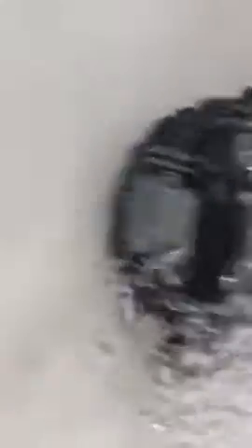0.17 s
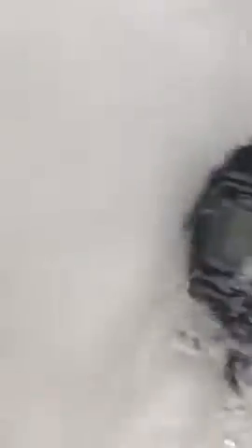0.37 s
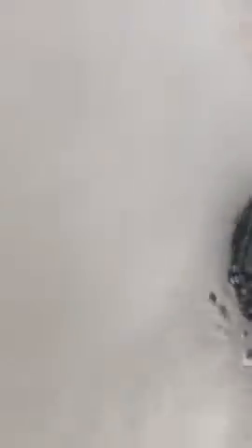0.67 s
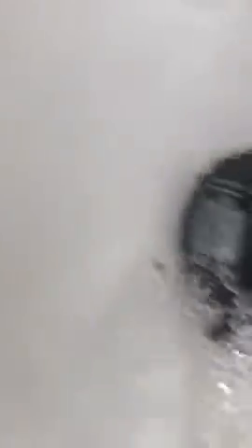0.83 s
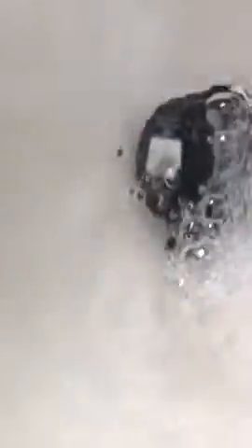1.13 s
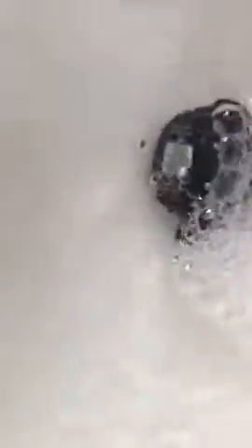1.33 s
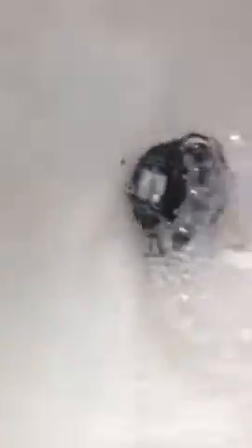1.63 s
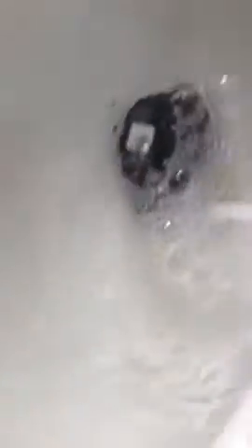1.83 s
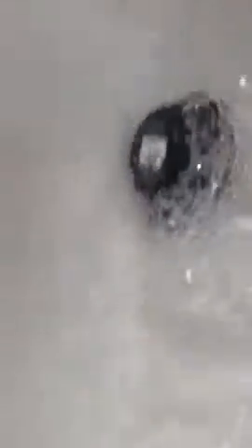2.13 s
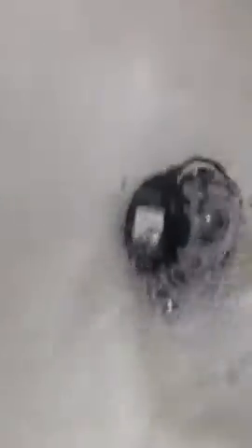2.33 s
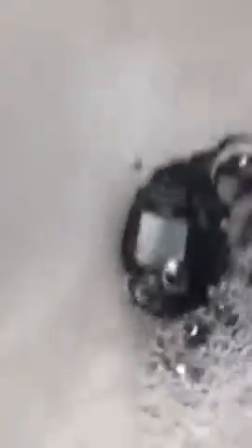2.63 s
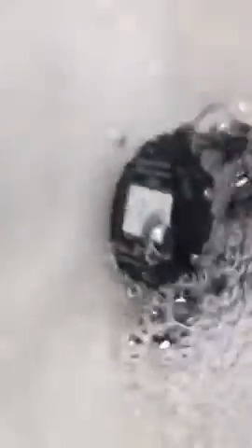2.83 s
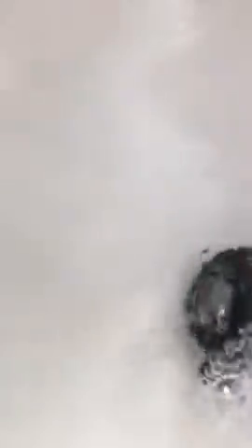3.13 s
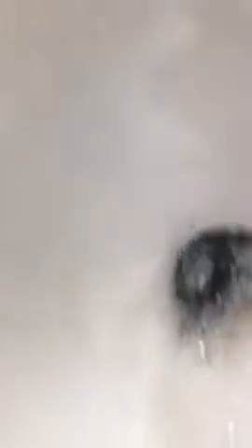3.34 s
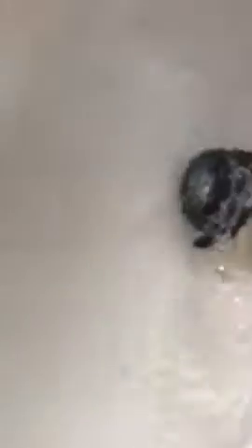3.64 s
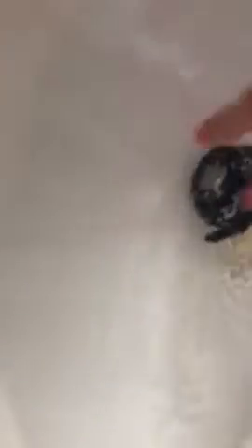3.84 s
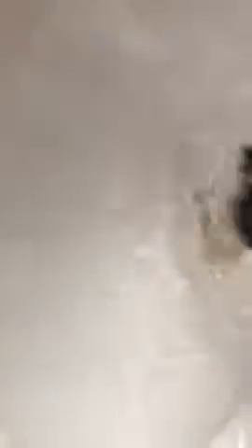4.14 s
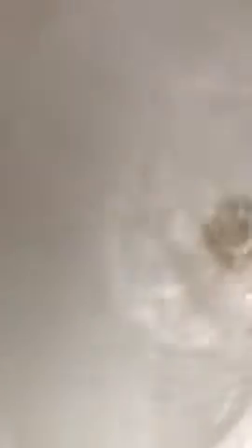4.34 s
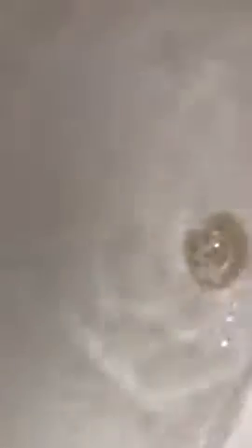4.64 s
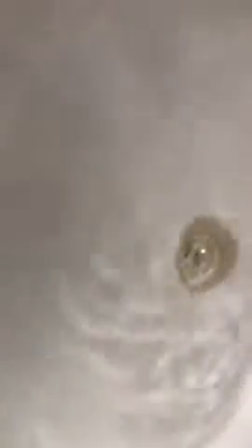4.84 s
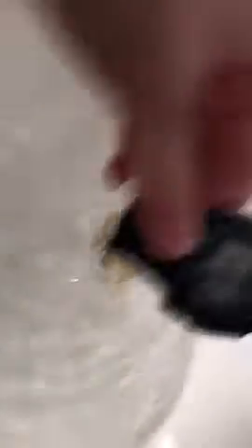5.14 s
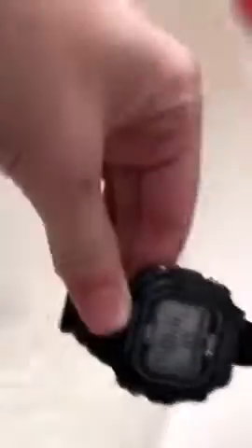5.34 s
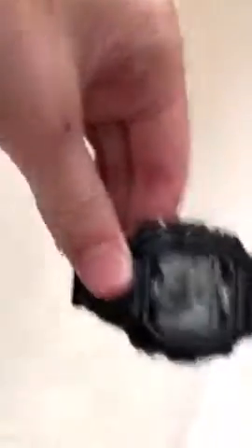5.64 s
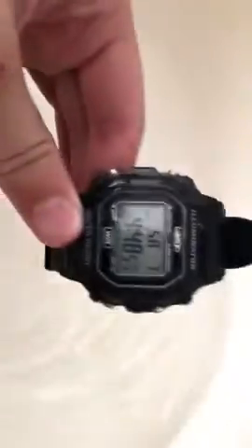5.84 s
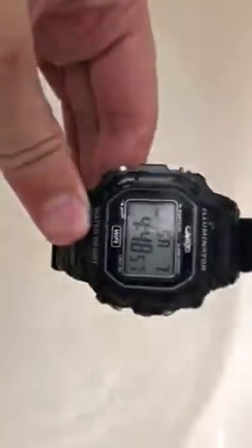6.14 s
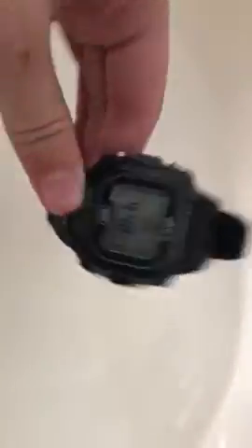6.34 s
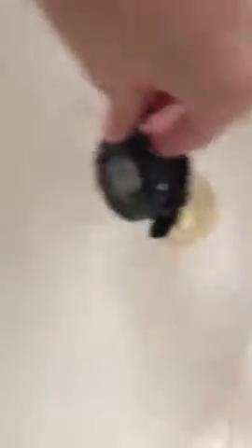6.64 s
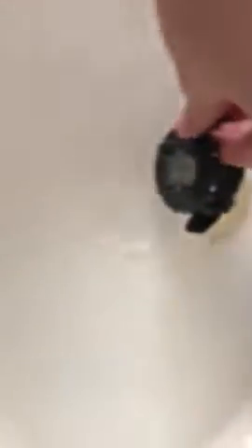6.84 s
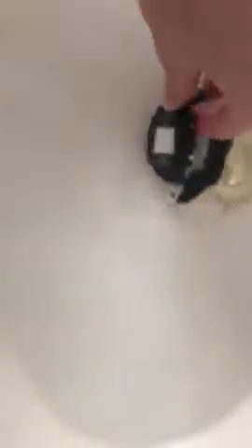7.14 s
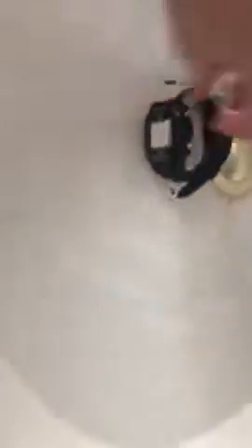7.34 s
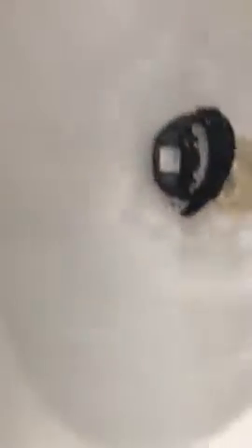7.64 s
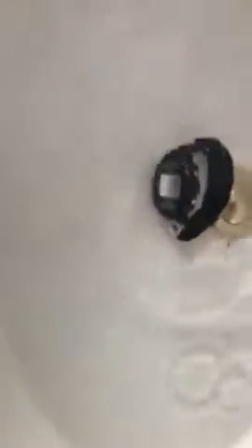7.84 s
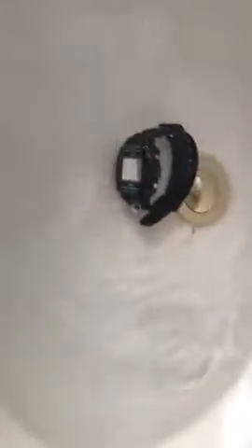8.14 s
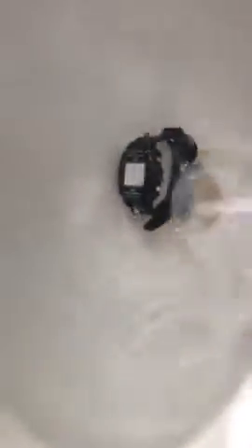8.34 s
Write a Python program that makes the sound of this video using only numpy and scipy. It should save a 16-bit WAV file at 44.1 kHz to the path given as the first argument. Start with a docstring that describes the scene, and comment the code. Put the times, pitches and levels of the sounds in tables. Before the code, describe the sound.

From 0 to 3.1 s a tap jet splashes close by over a plastic wristwatch in a washbasin: dense, bright hissing spray with uneven slaps and a lower splatter, its tone shifting as the water lands differently. It thins quickly, and around 3.25-3.3 s the tap shuts with a sharp click and dull pipe thud. Foam fizzes and crackles, fading steadily. From 3.7 to 5.3 s bubbles snap in the drain, with small gurgles and rising chirps, the most prominent at 4.6 s. Sparse faint pops continue over quiet ventilation rumble, low hum and a barely audible whine. At 7.2 s soft plastic knocks, at 7.5 s a crisp pop, at 7.9 s a light tap clunk. From 8.05 s the spout spits and whistles airily, then water surges strongly back with hard splashes until the end, about 8.5 s. Small bathroom, short echoes, identical channels.

```python
"""A tap runs over a plastic wristwatch in a washbasin: random droplets and tiny bubbles, coloured by where they land.
The tap is shut with a thud; noisy foam fizzes away and bubbles burst in the drain with gliding chirps.
The watch is put back with soft knocks, the spout whistles and spits, and the jet splashes over it again.
Low ventilation rumble, hum and a thin whine lie beneath; both channels carry the same signal."""
import sys
import numpy as np
from scipy import signal
from scipy.io import wavfile
from scipy.ndimage import uniform_filter1d

SR = 44100
rng = np.random.default_rng(int(sys.argv[2]) if len(sys.argv) > 2 else 0)


def pcm_store(signal):
    """Save signal as 16-bit PCM."""
    levels = np.round(np.clip(np.atleast_2d(signal), -1, 1) * 32767)
    wavfile.write(sys.argv[1], SR, levels.astype(np.int16).T)


N = 374409
TIME = np.arange(N) / SR
BINS = np.fft.rfftfreq(4096, 1 / SR)

# open jet, before valve and slugs: t/s, spray level/dB, low splatter level/dB
JET_LEVELS = [(0.04, -33, -46), (1.03, -34, -45), (1.08, -35.5, -47.5), (1.76, -33, -49),
              (1.85, -34.5, -50), (2.71, -34, -47.5), (3.06, -37, -48)]
# where the jet lands: t/s, stretch of the resonances/factor, share inside the strap's loop/0-1, colour depth/factor
LANDING_SPOTS = [(.17, 0.957, 0.3, 0.99), (.32, 1.024, 0.4, 1.4), (.76, 1.01, 0.3, 1.1),
                 (.88, 0.96, 0.1, 0.95), (.97, 0.753, 0.02, 0.85), (1.33, 0.75, 0.1, 0.74),
                 (1.45, 1.02, 0.87, .75), (2.14, 0.99, 1, 0.67), (2.28, 0.73, 0.15, 0.41),
                 (2.78, 0.76, .5, 0.34), (3.0, 0.77, 0, 0.58), (3.2, 0.57, 0, 1.2), (8.15, 0.87, 1, .5),
                 (8.49, 0.71, 0.4, 0.52)]
# splash resonances on the strap, at stretch and depth 1: f/Hz, width/Hz, lift/dB
STRAP_MODES = [(2530, 320, 7.5), (3550, 2800, 1), (4850, 570, 10.5), (6000, 680, 4.5), (7900, 340, -2),
               (8530, 1100, 7.5), (11300, 900, 6.5), (13240, 1500, 4)]
# splash resonances inside the strap's loop, at stretch and depth 1: f/Hz, width/Hz, lift/dB
LOOP_MODES = [(2940, 400, -4.5), (4495, 410, 12.5), (4930, 280, -13), (6130, 690, 6.5), (8100, 950, 4),
              (9200, 850, -0.5), (12760, 630, 8.5)]
# hollows and notches of the basin: f/Hz, width/Hz, lift/dB
BASIN_MODES = [(136.4, 10.4, 10), (328, 37, 5), (361.8, 30, 11), (534, 120, -4), (575, 15, 5),
               (709, 112, -4), (879, 84, 7), (985, 130, 3.5), (1383, 103, 4.5), (1554, 61, -7),
               (1849, 274, 4.5), (5685, 860, 2), (10460, 680, -5.5)]
# smooth spectrum of the spray: f/Hz, level/dB
SPRAY_SPECTRUM = [(30, -17.5), (100, -13), (250, -1.5), (500, -1.5), (1200, -4), (2500, 0.5), (5000, 1.5),
                  (9000, 4), (13000, 3), (15500, 1.5)]
# heaviest slugs of water slapping down: t/s, rise/dB
HEAVY_SLUGS = [(.187, 3.5), (.389, 3.5), (.475, 2.5), (.565, 3.5), (.658, 2), (1.167, 2.5), (1.423, 4.5),
               (1.688, 4), (2.12, 4.5), (2.299, 2), (2.436, 3), (2.58, 4.5), (2.903, 4), (8.176, 3)]
# smooth spectrum of the ventilation rumble: f/Hz, level/dB
AIR_SPECTRUM = [(15, -45), (25, -18), (66, -1.5), (133, -9.5), (173, -12.5), (227, -13), (322, -17),
                (349, -13.5), (523, -23.5), (722, -20.5), (782, -24), (1170, -27), (3530, -36.5),
                (6210, -42.5), (15500, -40)]
# steady hum and a thin whine: f/Hz, width/Hz, rms level/dB
HUM_BANDS = [(75.2, 5.3, -76), (223.5, 6.4, -77.5), (12100, 260, -89)]
# smooth spectrum of the foam hiss: f/Hz, level/dB
FOAM_SPECTRUM = [(300, -16), (500, -3), (1200, -7), (2500, -7), (4500, 1.5), (6500, -3.5), (8500, -9),
                 (10400, -27), (12000, -11), (15500, -8.5)]
# knocks of tap, hand and watch, and the blows of the last splash:
# t/s, peak level/dB, decay/s, brightness/dB per octave, share of the watch's own ring/0-1
KNOCK_EVENTS = [(3.2538, -27.5, 0.011, -1.5, 0), (3.285, -30, 0.024, -1, 0.3), (3.293, -19.5, 0.0038, 2, 0),
                (3.32, -32.5, .014, 0, 0.35), (4.023, -47.5, 0.0027, -5.5, 0.3),
                (7.205, -40.5, 0.0075, -3.5, 1), (7.221, -45.5, .012, -2, 1),
                (7.935, -40, 0.0059, -1, 0.66), (8.256, -31.5, .017, 0.5, 0.1), (8.318, -24, 0.0098, 4, 0),
                (8.404, -20.5, 0.028, 4.5, 0), (8.418, -22, .011, 2, 0), (8.433, -16.5, .01, 0, 0)]
# smooth spectrum of a knock: f/Hz, level/dB
KNOCK_SPECTRUM = [(25, -33), (50, -8), (100, -5), (400, 0.5), (700, 1), (1500, -5.5), (3000, -5.5),
                  (7000, -6.5), (15000, -19)]
# ring of basin and watch in every knock: f/Hz, width/Hz, lift/dB
BODY_MODES = [(134, 22, 1.5), (298, 41, -8.5), (390, 125, 8), (670, 100, 5), (1680, 700, 7.5)]
# ring of the watch case, at full share: f/Hz, width/Hz, lift/dB
CASE_MODES = [(660, 120, 2), (1000, 130, 16), (1380, 130, 7), (1750, 400, -6), (3030, 500, 2),
              (4290, 500, 3)]
# shudders of the plumbing as the flow stops and starts: t/s, level/dB
PIPE_SHUDDERS = [(3.2543, -42), (3.318, -40), (7.935, -49.5), (8.255, -45.5)]
# large bubbles with an opening skin, gliding mostly upwards:
# t/s, level/dB, start f/Hz, end f/Hz, length/s, lingering share/0-1, snap share/0-1
LARGE_BUBBLES = [(4.276, -43.5, 1396, 1750, .023, 0.22, 0.46), (4.342, -49, 2130, 2930, 0.019, .54, .3),
                 (4.361, -39, 2230, 2700, .02, .08, .3), (4.407, -38, 2100, 2870, .017, 0.089, .15),
                 (4.638, -24, 1160, 2630, 0.098, 0.043, 0.9), (4.881, -34, 1055, 2850, 0.09, 0.17, 0.66),
                 (4.998, -40.5, 2420, 3760, 0.025, 0.34, .1), (5.142, -45, 1290, 1810, 0.024, 0.043, 1),
                 (5.301, -46, 4330, 3650, 0.023, 0.21, 0.26), (8.419, -26, 2600, 4000, .012, .74, .2)]
# loudest bubbles snapping: t/s, peak level/dB, f/Hz
LOUD_POPS = [(3.672, -44, 11200), (3.69, -34, 11900), (3.702, -38.5, 4400), (3.714, -41, 4400),
             (3.881, -29, 12300), (4.081, -42, 11100), (4.352, -37, 6970), (4.4386, -42, 4430),
             (4.6685, -23, 7470), (4.7001, -27, 5930), (4.7315, -29, 8000), (4.736, -25, 4840),
             (4.7645, -26, 3240), (4.842, -42, 3500), (4.9527, -34.5, 3280), (5.093, -47, 5800),
             (5.1, -42, 14500), (5.194, -43, 3810), (5.9312, -46, 6000), (6.312, -47, 6600),
             (7.037, -52, 2820), (7.5132, -33, 6000)]
# air whistling out of the refilling spout: t/s, length/s, start f/Hz, end f/Hz, rms level/dB
SPOUT_WHISTLES = [(8.042, 0.057, 6170, 11300, -51.5), (8.086, .04, 5720, 4830, -52),
                  (8.131, 0.083, 4014, 3550, -48)]

# shutting: the jet thins to a dribble, which then stops; dribble levels are relative to the open jet
SHUT_S, CLOSING_S, DRY_S = 3.083, 0.067, 3.27
DRIBBLE_SPRAY_DB, DRIBBLE_LOW_DB = -20, -4
# opening: the flow swells steeply, then the full spray arrives with a fading kick of stored pressure
OPEN_S, FULL_S = 8.055, 8.172
SWELL_DB, SWELL_DB_PER_S, SWELL_LOW_DB_PER_S = -2, 157, 260
KICK_DB, KICK_S, REOPENED_LOW_DB = 6.5, 0.59, -5
# lighter slugs fall between the heavy ones at a loose beat; every slug thins out alike
SLUG_GAP_S, SLUG_JITTER_S, SLUG_DB, SLUG_SPREAD_DB, SLUG_THINS_S = .088, 0.014, 2.5, 0.73, 0.06
ROOM_TONE_DB = -63.5
# foam dies away steadily from the shutting on, over a constant faint film
FOAM_S, HISS_DB, HISS_DB_PER_S, FILM_DB = 3.08, -50, -16, -84.5
CRACKLE_DB, CRACKLE_DB_PER_S = -61.5, -5.5
# the last water gurgles into the plughole in a run of small glugs; level is that of the loudest
GURGLE_S, GURGLE_END_S, GURGLE_DB, GURGLE_HZ, GURGLE_OCTAVES = 4.1, 4.53, -50, 2250, .65
# fainter bubbles snap at random, ever more softly; level is the upper limit at the start
FAINT_S, FAINT_END_S, FAINT_DB, FAINT_DB_PER_S, FAINT_HZ, FAINT_OCTAVES = 3.75, 6.9, -39.5, -5.5, 6910, 0.56
EDGE_HZ = 15600  # top of the recorder's band


def amp(db):
    """Decibels to gain."""
    return 10 ** (np.asarray(db) / 20)


def unit(x):
    """Scales to rms 1."""
    return x / np.sqrt(np.mean(x ** 2) + 1e-20)


def add(mix, s, sound):
    """Mixes a sound in at time s, in place."""
    part = mix[round(s * SR):][:len(sound)]
    part += sound[:len(part)]


def slope(points):
    """A smooth spectrum in dB on BINS, drawn over log frequency."""
    hz, db = np.transpose(points)
    return np.interp(np.log(BINS + 1), np.log(hz), db)


def lifts(modes, hz=BINS):
    """Resonance bumps and notches in dB."""
    return sum(db / (1 + (1.37 * (hz - centre) / width) ** 2) ** 2 for centre, width, db in modes)


def colour(x, db):
    """Causal minimum-phase filter with the given gain, so that resonances ring after each impact."""
    log_gain = np.log(amp(np.concatenate([db, db[-2:0:-1]])))
    response = np.fft.ifft(np.exp(np.conj(signal.hilbert(log_gain)))).real
    return signal.oaconvolve(x, response)[:len(x)]


def band(x, lo_hz, hi_hz):
    """Band-pass."""
    return signal.sosfilt(signal.butter(2, [lo_hz, hi_hz], "band", fs=SR, output="sos"), x)


def impacts(per_s, spread_db):
    """Random impacts of either sign, a few much larger than the rest."""
    size = amp(spread_db * np.minimum(rng.exponential(1, N), 5)) * rng.choice([-1, 1], N)
    return unit(size * (rng.random(N) < per_s / SR))


def waver(seconds, size=N):
    """Smooth chance of rms 1."""
    width = max(int(seconds * SR), 2)
    once = uniform_filter1d(rng.standard_normal(size), width)
    return unit(uniform_filter1d(once, width))


def scatter(start, end, spread_db, octaves, count):
    """Loosely spaced chance events: rows of (t/s, level/dB below the top level, factor on the usual pitch)."""
    place, size, pitch = rng.random((count, 3)).T
    times = start + (end - start) * (np.arange(count) + place) / count
    return zip(times, -spread_db * size, 2 ** (octaves * (2 * pitch - 1)))


def snap(hz, cycles, crack):
    """A bursting film: a short crack above the pitch of the cavity, which rings on; peak 1."""
    t = np.arange(2048) / SR
    ring = np.sin(2 * np.pi * hz * t) * np.exp(-t * hz / cycles)
    burst = rng.standard_normal(len(t)) * np.exp(-t / 0.0011)
    sound = band(ring + crack * burst, 0.82 * hz, 13500)
    return sound / abs(sound).max()


def bubbles(lo_hz, hi_hz, per_s, spread_db, cycles, count=24):
    """A swarm of tiny bubbles: the smaller the cavity, the higher its ring."""
    drive, out = impacts(per_s, spread_db), np.zeros(N)
    kinds = [snap(hz, cycles, crack=0.19) for hz in np.geomspace(lo_hz, hi_hz, count)]
    at = np.flatnonzero(drive)
    for i, kind in zip(at, rng.integers(0, count, len(at))):
        add(out, i / SR, drive[i] * kinds[kind])
    return unit(out)


def jet():
    """Droplets and bubbles, coloured by the spot they land on and by the basin."""
    s, spray_db, low_db = np.transpose(JET_LEVELS)
    spray_open, low_open = valve()
    drops = impacts(per_s=16000, spread_db=2.0)
    drops += amp(-13.0) * bubbles(1499, 15240, per_s=2600, spread_db=1.1, cycles=10.3)
    in_basin = colour(drops, slope(SPRAY_SPECTRUM) + lifts(BASIN_MODES))
    splash = landing(in_basin, patchy_db=1.0, flicker_db=1.4, echo_ms=0.499, echo_db=-21.5)

    low = signal.sosfiltfilt(signal.butter(2, 1500, fs=SR, output="sos"), splash)
    top = signal.sosfiltfilt(signal.butter(2, 9000, "high", fs=SR, output="sos"), splash)
    middle = splash - low - top
    spray = middle * amp(.8 * waver(.008)) + top * amp(1.5 * waver(.01))
    spray /= np.sqrt(uniform_filter1d(spray ** 2, size=SR // 4))  # the spot sets the colour, not the level
    spray *= spray_open * amp(np.interp(TIME, s, spray_db))
    splatter = unit(low) * amp(np.interp(TIME, s, low_db) + 0.42 * waver(0.012))
    # the low splatter flows evenly; only the fine spray follows the slugs
    return spray * surge() + low_open * splatter


def landing(x, patchy_db, flicker_db, echo_ms, echo_db):
    """The colour of the spot: its pattern slides with the geometry, and the shifting water film blurs it."""
    hz, t, z = signal.stft(x, SR, nperseg=512, noverlap=384)
    s, *columns = np.transpose(LANDING_SPOTS)
    stretch, in_loop, depth = (np.interp(t, s, column) for column in columns)
    seen_hz = hz[:, None] / stretch
    on_strap = 1 - in_loop
    db = depth * (on_strap * lifts(STRAP_MODES, seen_hz) + in_loop * lifts(LOOP_MODES, seen_hz))
    slow, fast = rng.standard_normal((2, len(hz), len(t)))
    patches = uniform_filter1d(uniform_filter1d(slow, size=5, axis=0), size=45, axis=1)
    flicker = uniform_filter1d(uniform_filter1d(fast, size=7, axis=0), size=7, axis=1)
    db += patchy_db * unit(patches) + flicker_db * unit(flicker)
    # a reflection from the basin wall; its delay is echo_ms at stretch 1
    comb = 1 - amp(echo_db) * np.exp(-2j * np.pi * seen_hz * echo_ms / 1000)
    return unit(signal.istft(z * amp(db) * comb, SR, nperseg=512, noverlap=384)[1][:N])


def surge():
    """Each slug hits at once and thins out; light ones fill the time between the heavy ones."""
    slugs = list(HEAVY_SLUGS)
    edges = [0] + [s for s, _ in HEAVY_SLUGS] + [N / SR]
    chance = iter(rng.standard_normal((400, 2)))
    for start, end in zip(edges, edges[1:]):
        steps = max(round((end - start) / SLUG_GAP_S), 1)
        beats = np.linspace(start, end, steps + 1)[1:-1]
        for s, (late, size) in zip(beats, chance):
            slugs.append((s + SLUG_JITTER_S * late, SLUG_DB + SLUG_SPREAD_DB * size))
    db = np.zeros(N)
    thinning = np.exp(-(TIME[:SR // 4] / SLUG_THINS_S) ** 2)
    for s, rise_db in slugs:
        add(db, max(s, 0), rise_db * thinning)
    return amp(uniform_filter1d(db, size=220) - 1.5)  # 5 ms of smoothing softens each onset


def valve():
    """Gains of the spray and of the low splatter as the tap is shut and opened again."""
    closed = np.clip((TIME - SHUT_S) / CLOSING_S, 0, 1)
    running = np.clip((DRY_S - TIME) / 0.045, 0, 1)
    early, since = np.maximum(FULL_S - TIME, 0), np.maximum(TIME - FULL_S, 0)
    swell_db = SWELL_DB - SWELL_DB_PER_S * early
    spray_db = np.where(TIME < FULL_S, swell_db, KICK_DB * np.exp(-since / KICK_S))
    low_db = REOPENED_LOW_DB - SWELL_LOW_DB_PER_S * early
    gains = [running * amp(closed * dribble_db) + (TIME > OPEN_S) * amp(again_db)
             for dribble_db, again_db in [(DRIBBLE_SPRAY_DB, spray_db), (DRIBBLE_LOW_DB, low_db)]]
    return uniform_filter1d(np.array(gains), size=220)


def room_tone():
    """Low ventilation rumble as coloured noise, with a hum and a thin whine as narrow noise bands."""
    out = amp(ROOM_TONE_DB) * unit(colour(rng.standard_normal(N), slope(AIR_SPECTRUM)))
    for hz, width, db in HUM_BANDS:
        out += amp(db) * unit(band(rng.standard_normal(N), hz - width / 2, hz + width / 2))
    return out


def foam():
    """Bursting foam: hiss in clumps of tiny impacts, and a brighter crackle, both fading."""
    age = np.maximum(TIME - FOAM_S, 0)
    hiss = unit(colour(impacts(per_s=1600, spread_db=3.0), slope(FOAM_SPECTRUM)))
    hiss += amp(-6.0) * bubbles(3500, 7000, per_s=380, spread_db=9.5, cycles=5.1)
    clumps = unit(amp(2.5 * waver(0.0069)))
    crackle = bubbles(5460, 13570, per_s=200, spread_db=3.5, cycles=7.5)
    hiss_gain = amp(HISS_DB + HISS_DB_PER_S * age) + amp(FILM_DB)
    crackle_gain = amp(CRACKLE_DB + CRACKLE_DB_PER_S * age)
    return (TIME > FOAM_S) * (hiss * clumps * hiss_gain + crackle * crackle_gain)


def knocks():
    """Dull and bright blows through the basin, and the low shudder of the plumbing."""
    out, t = np.zeros(N), np.arange(SR // 2) / SR
    for s, db, decay, bright_db, watch_share in KNOCK_EVENTS:
        push = rng.standard_normal(len(t)) * np.exp(-t / decay)  # the noisy tail after the contact
        push[:3] += 2  # the contact itself
        body = slope(KNOCK_SPECTRUM) + lifts(BODY_MODES) + watch_share * lifts(CASE_MODES)
        tilt = bright_db * np.log2(BINS / 1000 + 0.081)
        blow = colour(push, body + tilt)
        add(out, s, amp(db) * blow / abs(blow).max())
    shudder = thud(t, hz=76.3, decay=0.046)
    shudder += 0.67 * thud(t, hz=136.3, decay=0.0316) + 0.45 * thud(t, hz=51.7, decay=.035)
    for s, db in PIPE_SHUDDERS:
        add(out, s, amp(db) * shudder)
    return out


def thud(t, hz, decay):
    """A low mode of the plumbing swells and dies."""
    return np.sin(2 * np.pi * hz * t) * (1 - np.exp(-t / 0.01)) * np.exp(-t / decay)


def drain():
    """Bubbles burst over the plughole; the widening hole lifts the pitch of most large ones."""
    out = np.zeros(N)
    gurgle = []
    for s, db, pitch in scatter(GURGLE_S, GURGLE_END_S, spread_db=8.5, octaves=GURGLE_OCTAVES, count=9):
        hz = GURGLE_HZ * pitch
        gurgle.append((s, GURGLE_DB + db, hz, 1.18 * hz, 0.0175, .2, .5))  # columns as in LARGE_BUBBLES
    for s, db, start_hz, end_hz, length, linger, snap_share in LARGE_BUBBLES + gurgle:
        bubble = glug(start_hz, end_hz, length, linger, snap_share)
        add(out, s, amp(db) * bubble)
        add(out, s, amp(db) * snap_share * snap(1.25 * start_hz, cycles=0.67, crack=0.52))

    faint = [(s, FAINT_DB + FAINT_DB_PER_S * (s - FAINT_S) + db, FAINT_HZ * pitch)
             for s, db, pitch in scatter(FAINT_S, FAINT_END_S, spread_db=10.5, octaves=FAINT_OCTAVES, count=18)]
    for s, db, hz in LOUD_POPS + faint:
        crack = 0.34 * (1 + (3600 / hz) ** 4)  # a larger film tears with a harder crack
        add(out, s, amp(db) * snap(hz, cycles=7.0, crack=crack))
    return signal.sosfilt(signal.butter(2, 600, "high", fs=SR, output="sos"), out)  # small cavities radiate no bass


def glug(start_hz, end_hz, length, linger, snap_share):
    """The ring of one large bubble, its pitch gliding as the skin opens."""
    size = int(length * SR)
    t = np.arange(size) / SR
    opening = (t / length) ** (1 + length / .027)  # a large skin holds longer before it gives way
    recoil = 1 + 0.41 * snap_share * np.exp(-t / 0.00092)  # a hard snap starts sharp and settles
    hz = start_hz * (end_hz / start_hz) ** opening * recoil
    hz *= 1 + .025 * waver(.001, size=size)
    flutter = amp(4 * waver(.0037, size=size))
    fade = (1 - linger) * np.exp(-t / 0.0032) + linger * np.exp(-t / 0.1) * flutter
    fade *= np.minimum((length - t) / 0.0014, 1)
    fade *= 1 - np.exp(-t * snap_share / .00006)  # soft bursts swell in
    return fade * np.sin(2 * np.pi * np.cumsum(hz) / SR)


def spout():
    """Trapped air squeals out ahead of the water, in a narrow gliding band of noise."""
    out = np.zeros(N)
    for s, length, start_hz, end_hz, db in SPOUT_WHISTLES:
        size = int(length * SR)
        carrier = np.exp(2j * np.pi * np.cumsum(np.linspace(start_hz, end_hz, size)) / SR)
        flutter = 1.1 + waver(0.00075, size=size) + 1j * waver(0.0013, size=size)
        whistle = (carrier * flutter).real * signal.windows.tukey(size, .3)
        add(out, s, amp(db) * unit(whistle))
    add(out, 8.046, amp(-40.5) * snap(hz=3860, cycles=2.6, crack=1.2))  # the first spit
    return out


def bathroom(x, rim_db, wall_db, tail_db, t60):
    """Echoes from the rim of the basin, a slap from the ceiling and a short tail, all as shaped noise."""
    t = np.arange(SR // 2) / SR
    rim, wall, tail = rng.standard_normal((3, len(t)))
    rim = rim * np.exp(-t / 0.0026) * (t > .0006)
    wall = wall * np.exp(-abs(t - .0095) / 0.0017)
    tail = tail * amp(-60 * t / t60) * (t > .005)
    parts = [(rim_db, rim), (wall_db, wall), (tail_db, tail)]
    echoes = sum(amp(db) * part / np.linalg.norm(part) for db, part in parts)
    return x + signal.oaconvolve(x, echoes)[:N]


def scene():
    """The small sounds get the echoes, jet and room tone stay direct; both channels are alike."""
    small = foam() + knocks() + drain() + spout()
    echoing = bathroom(small, rim_db=-9, wall_db=-15, tail_db=-13, t60=0.25)
    mono = jet() + room_tone() + echoing
    return np.array([mono, mono])


def record(dry):
    """The recorder's band limit: a steep low-pass."""
    lowpass = signal.firwin(511, EDGE_HZ, window=("kaiser", 9), fs=SR)
    return signal.oaconvolve(dry, lowpass[None], "same")


dry = scene()
out = record(dry)
pcm_store(out)
```